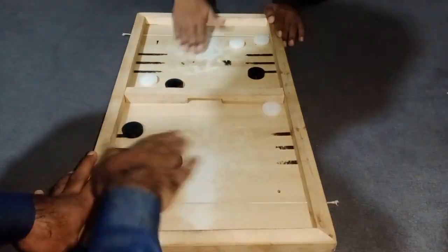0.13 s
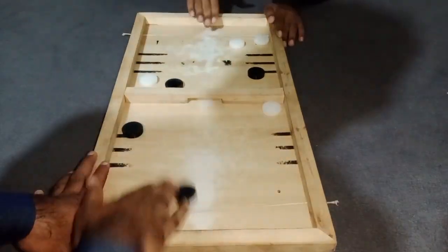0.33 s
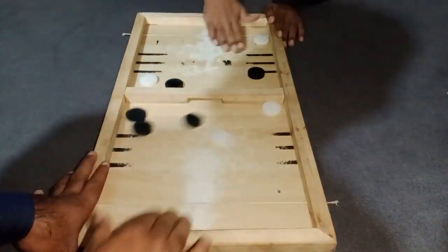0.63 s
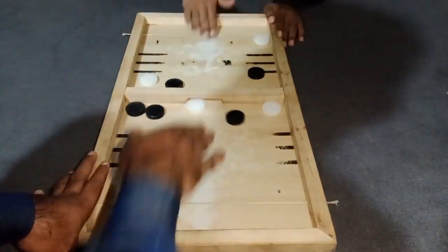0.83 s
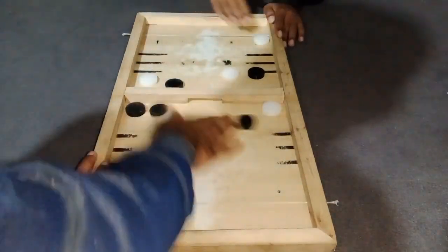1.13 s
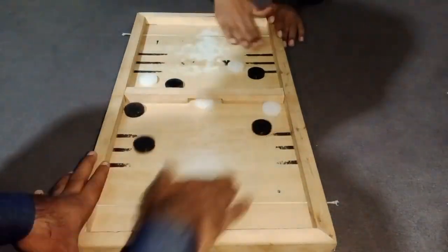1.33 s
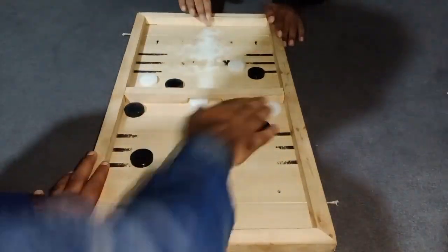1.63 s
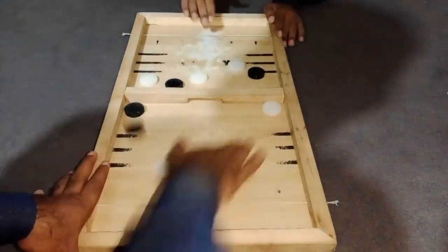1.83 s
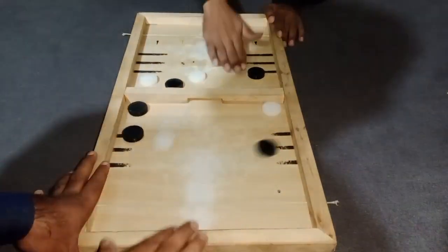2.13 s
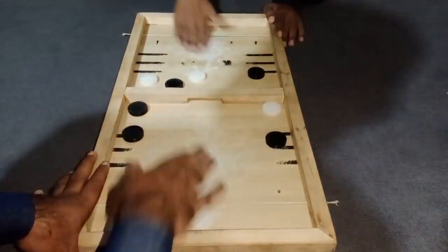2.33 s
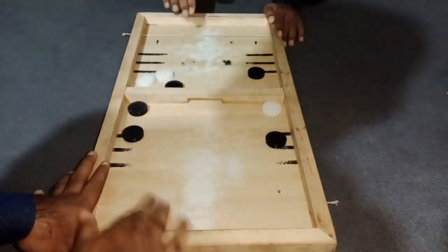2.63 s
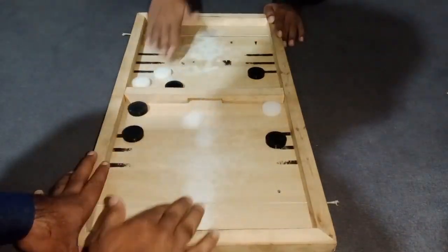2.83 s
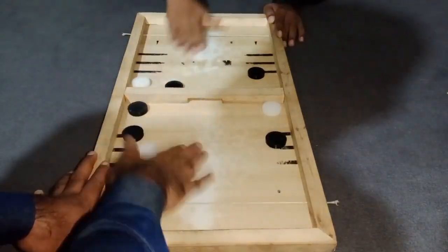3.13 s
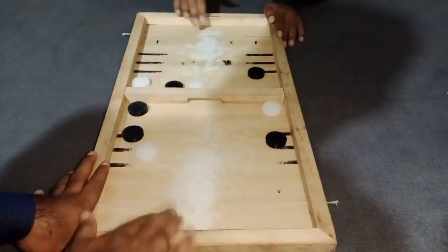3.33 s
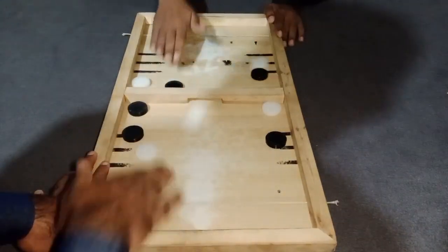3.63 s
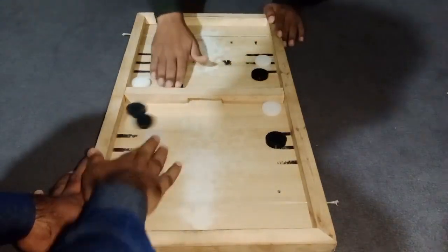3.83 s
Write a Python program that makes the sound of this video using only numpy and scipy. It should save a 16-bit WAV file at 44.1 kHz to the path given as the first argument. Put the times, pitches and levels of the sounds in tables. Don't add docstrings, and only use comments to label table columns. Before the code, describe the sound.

Half a second of soft sliding and scraping, then irregular sharp puck clacks with woody knocks, rebounds and dull frame thumps; small bare room, close phone recording, mono, compressed loudness, faint low background hum.

```python
import sys
import numpy as np
from scipy import signal
from scipy.fft import rfft, irfft, next_fast_len
from scipy.io import wavfile
from scipy.ndimage import uniform_filter1d

SR = 44100
rng = np.random.default_rng(int(sys.argv[2]) if len(sys.argv) > 2 else 0)


def transcribe(signal):
    frames = np.atleast_2d(signal).T
    limited = np.clip(frames, -1, 1)
    pcm = np.round(limited * 32767).astype(np.int16)
    wavfile.write(sys.argv[1], SR, pcm)


def amplitude_ratio(level_db):
    exponent = np.asarray(level_db, float) / 20
    return 10 ** exponent


N = 176400


def unit(x):
    return x / np.sqrt(np.mean(x ** 2, -1, keepdims=True) + 1e-20)


def peak(x):
    return x / np.abs(x).max(1, keepdims=True)


def energy(x):
    return x / np.linalg.norm(x, axis=1, keepdims=True)


def along(points, hz):
    f, v = np.transpose(points)
    return np.interp(np.log(hz + 1), np.log(f + 1), v)


def filtered(x, response):
    m = next_fast_len(x.shape[-1] + 8192)
    spectrum = rfft(x, m) * response(np.fft.rfftfreq(m, 1 / SR))
    return irfft(spectrum, m)[..., :x.shape[-1]]


def patches(shape, across, along_time):
    field = rng.standard_normal(shape)
    field = uniform_filter1d(field, size=across, axis=-2)
    field = uniform_filter1d(field, size=along_time, axis=-1)
    return field / field.std()


def rush(spectrum, patchy_db):
    z = signal.stft(rng.standard_normal(N + 512), nperseg=512)[2]
    field = patches(z.shape, 5, 16)
    field = field - 0.35 * field ** 2
    x = signal.istft(z * amplitude_ratio(patchy_db * field), nperseg=512)[1][:N]
    low_end, high_end = (spectrum[0][0] / 2, -60), (spectrum[-1][0] * 1.5, -60)
    edge = [low_end, *spectrum, high_end]
    return unit(filtered(x, lambda hz: amplitude_ratio(along(edge, hz))))


def placed(times, sounds):
    out = np.zeros(N + 2 * SR)
    for s, x in zip(times, sounds):
        out[round((s + 1) * SR):][:len(x)] += x
    return out[SR:SR + N]


# (frequency [Hz], time to fall 60 dB [s])
ROOM_RING = [(200, 0.52), (1000, 0.37), (4000, 0.38), (12000, 0.17)]
# (frequency [Hz], level [dB])
ROOM_COLOUR = [(200, -0.5), (1000, 0.5), (4000, 0), (8000, -1), (14000, -16.5)]


def room(sounds):
    patchy_db, build_s = 2.2, 0.027
    f, u, z = signal.stft(rng.standard_normal((len(sounds), 28000)), SR, nperseg=256)
    colour_db = along(ROOM_COLOUR, f)[:, None]
    decay_db = -60 * u / along(ROOM_RING, f)[:, None]
    tail_db = patchy_db * patches(z.shape, 3, 12) + colour_db + decay_db
    tail = energy(signal.istft(z * amplitude_ratio(tail_db), SR, nperseg=256)[1])
    rise = np.minimum(np.arange(tail.shape[1]) / (build_s * SR), 1)
    return signal.fftconvolve(sounds, tail * rise, axes=1)


# (time [s], level [dB], pitch [Hz], time to fall 60 dB [s], level sent to the room [dB])
EARLIER_JOLT = (-.06, -24, 248, 0.018, 3)
JOLTS = [(0.360, -44, 252, 0.035, -8), (0.565, -21, 402, 0.017, 5.5), (0.617, -21, 397, 0.018, 5.5),
         (1.069, -24.5, 395, 0.022, 4.5), (1.071, -21.5, 650, 0.012, 9), (1.275, -24, 430, 0.017, -7),
         (1.282, -25.5, 333, 0.026, -0.5), (1.283, -16, 1330, 0.018, 10), (1.778, -22.5, 444, 0.018, 4.5),
         (2.122, -9, 400, 0.0098, -33), (2.124, -4.5, 112.3, 0.012, -32), (2.575, -29, 355, 0.047, 13.5),
         (2.605, -9, 388, 0.015, 5.5), (2.606, -13, 710, 0.0093, 8), (2.689, -28, 183, 0.033, 0),
         (2.853, -12, 930, 0.012, 8), (3.273, -16.5, 296, 0.027, -10.5), (3.468, -16, 856, 0.012, 13),
         (3.619, -29, 384, 0.05, -1.5), (3.686, -26, 283, 0.03, -6.5), (3.695, -17.5, 493, 0.02, -10)]


def frame():
    s, db, hz, t60, room_db = np.transpose([EARLIER_JOLT, *JOLTS])[..., None]
    t = np.arange(8192) / SR
    soft_start = 1 - np.exp(-t / 0.0017)
    jolts = amplitude_ratio(db - 60 * t / t60) * soft_start * np.sin(2 * np.pi * hz * t)
    return placed(s[:, 0], jolts) + placed(s[:, 0], room(amplitude_ratio(room_db) * jolts))


# (time [s], heard peak [dB], clack pitch [Hz], wood knock [dB], limiter duck [dB])
EARLIER_BLOW = (-0.05, -9, 2600, -1.5, 10.5)
RAIL_BLOWS = [(0.5621, -5.5, 6800, -7, 9), (0.6165, -5.5, 2970, -1.5, 7.5), (0.6421, -5.5, 2870, -2, 6),
              (0.8771, -5.5, 7060, -2.5, 5), (1.0676, -8, 5220, -6, 9), (1.273, -10.5, 7800, -5, 8),
              (1.2805, -7, 2970, -2.5, 8.5), (1.4082, -8.5, 3650, -4.5, 3.5), (1.7781, -6, 5080, -8.5, 10),
              (1.928, -6, 5500, -20.5, 8), (1.983, -12, 4050, -4.5, 10.5), (2.1218, -5, 6700, -23, 8.5),
              (2.172, -3.5, 3240, -1.5, 11.5), (2.6036, -4, 5070, -4, 12), (2.8515, -6, 2860, 1, 9),
              (2.9003, -10, 3570, -2, 8), (3.4668, -8, 4300, 2, 10), (3.902, -13, 6700, -23, 7),
              (3.808, -13, 1290, 2, -2), (3.9461, -14, 4100, -11, 5)]
# (time [s], heard peak [dB], clack pitch [Hz], wood knock [dB], level sent to the room [dB])
TAPS = [(0.581, -18, 3040, -2, 0), (0.6581, -8.5, 4600, -1, 0), (0.7035, -7, 2870, 6, 3),
        (0.764, -12, 4170, -4, -18), (.847, -17, 1550, 0.5, 0.5), (0.8668, -15, 2310, -1, -2.5),
        (0.8958, -12.5, 7400, -13, 4), (0.9148, -10, 2450, -3.5, -3.5), (0.9323, -15.5, 1235, -6, -17),
        (0.9675, -21, 2550, -10, -21), (1.3537, -7, 2080, 3, -4), (1.376, -17.5, 2800, 7, -7),
        (1.8, -21, 1270, 5, -1), (1.9883, -11.5, 4300, -10, -11), (2.3332, -9, 1300, 10.5, 0.5),
        (2.675, -22, 1000, 4, -9), (2.716, -19, 1490, -2, -12), (2.7432, -13, 1230, 13, -7),
        (2.8738, -20.5, 3570, 7, -2), (3.5792, -7.5, 6760, -10.5, 4.5), (3.6172, -5.5, 1340, 6, 3.5),
        (3.694, -9, 6650, -7, 1), (3.7136, -16, 4060, -6, -7), (3.687, -18, 1300, -5, -18),
        (3.737, -17.5, 4500, -4, -27), (3.826, -21, 2455, -6, -24), (3.912, -10, 5400, -18, -6),
        (3.923, -12, 2420, -2, 3), (3.952, -12, 2870, 9, 2.5)]


def contacts():
    s, db, hz, knock_db, duck_db = np.transpose([EARLIER_BLOW, *RAIL_BLOWS])
    room_db = 11 + 1.3 * (duck_db - 9)
    return np.hstack([[s, db, hz, knock_db, room_db], np.transpose(TAPS)])


# (pitch [Hz], level [dB], time to fall 60 dB [s])
BOARD_MODES = [(575, -22, 0.0098), (847, -20.5, 0.018), (956, 3, 0.038), (1207, 4, 0.038), (1372, 7, 0.02),
               (1722, -4, 0.07), (2040, -8.5, 0.059), (2870, 5, 0.018), (3705, 10.5, 0.0076)]


def board(chance, damping):
    t = np.arange(4096) / SR
    ring = 0
    for k, (hz, level_db, t60) in enumerate(BOARD_MODES):
        mode_db = level_db + 2 * chance[:, :1, k] - 60 * t * damping / t60
        mode_hz = hz * (1 + 0.068 * chance[:, 1:, k])
        ring = ring + amplitude_ratio(mode_db) * np.sin(2 * np.pi * mode_hz * t)
    return peak(ring)


def pucks():
    clack_cycles, crack_db, thin_hz = 46, -29, 520
    delay_s = 0.0008
    s, db, hz, knock_db, room_db = contacts()
    t = np.arange(4096) / SR
    c = hz[:, None]
    db = db - limiter_db()[np.maximum((s + delay_s) * SR, 0).astype(int)]

    def clack(f, width):
        resonance = 1j * f * c * width / (c * c - f * f + 1j * f * c * width)
        return resonance ** 2 + amplitude_ratio(crack_db) * (c / 5000) ** 4.5

    def thin(f):
        return (1j * f / (thin_hz + 1j * f)) ** 3

    fall_db = 60 * t * 4000 * (c / 4000) ** 0.53 / clack_cycles
    noise = rng.standard_normal((len(s), len(t))) * amplitude_ratio(-fall_db)
    click = np.zeros_like(noise)
    click[:, 0] = 1
    chance = rng.standard_normal((len(s), 2, len(BOARD_MODES)))
    knock = amplitude_ratio(knock_db)[:, None]

    near_clack = peak(filtered(noise, lambda f: clack(f, 0.89)))
    near = peak(filtered(near_clack + knock * board(chance, 1), thin))
    far_clack = 1.496 * peak(filtered(click, lambda f: clack(f, 2.2)))
    far = energy(filtered(far_clack + knock * board(chance, 2.2), thin))
    direct = placed(s + delay_s, amplitude_ratio(db)[:, None] * near)
    return direct + placed(s, room(amplitude_ratio(room_db)[:, None] * far))


# (time [s], hiss [dB], board rasp over hiss [dB], finest powder fizz [dB])
SLIDES = [(0, -46, 9.5, -72), (.19, -51, -1, -90), (.27, -44, -15.5, -63.5), (.48, -43, 1.5, -59.5),
          (.8, -38.5, -6, -63), (1.12, -49.5, -10, -57), (1.41, -46, 2, -77), (1.57, -36, -11.5, -50.5),
          (1.74, -51.5, -5, -68), (2.0, -39.5, 0, -53), (2.22, -49, 7.5, -74), (2.45, -39, -8, -59.5),
          (2.68, -40.5, -5, -55), (2.9, -45, -8, -69), (3.141, -51, -5, -75), (3.221, -41.5, -5.5, -54.5),
          (3.45, -43.5, -3, -66), (4, -50, -10, -66)]
# (frequency [Hz], level per Hz [dB])
HISS = [(1180, -32), (2000, -7.5), (2430, -9.5), (3210, -20), (3950, -20.5), (7580, 2), (10500, -15),
        (13600, -24), (22000, -120)]
RASP = [(180, -17), (300, -26), (336, 2.5), (882, -43), (975, -6), (1350, 6), (2200, -6.5), (4070, 7),
        (6000, -2), (7800, -57), (13200, -120)]
FIZZ = [(10000, 4), (12500, 0), (15500, -2.5)]


def sliding():
    s, *levels = np.transpose(SLIDES)
    hiss_db, rasp_db, fizz_db = [np.interp(np.arange(N) / SR, s, v) for v in levels]
    hiss = rush(HISS, patchy_db=3)
    rasp = rush(RASP, patchy_db=5)
    fizz = rush(FIZZ, patchy_db=10.5)
    return amplitude_ratio(hiss_db + 3.0) * (hiss + amplitude_ratio(rasp_db) * rasp) + amplitude_ratio(fizz_db + 14.5) * fizz


# (time [s], length [s], from pitch [Hz], to pitch [Hz], level [dB])
SCRAPES = [(0.0, 0.23, 1410, 1325, -37.5), (0.059, 0.18, 430, 448, -53.5), (0.247, 0.094, 3200, 3280, -50),
           (0.293, .08, 1600, 1715, -58), (0.373, 0.16, 1250, 1374, -50), (0.381, 0.11, 3890, 3410, -45),
           (0.439, 0.12, 1700, 2200, -51), (1.206, 0.13, 400, 384, -48), (1.501, 0.26, 680, 635, -54.5),
           (1.584, 0.13, 1900, 2170, -54), (1.602, 0.053, 3600, 3900, -41.5),
           (1.686, 0.067, 2100, 1960, -52), (2.0, .1, 2200, 2300, -40), (2.298, 0.2, 400, 396, -51.5),
           (2.488, 0.066, 1750, 2180, -42.5), (2.511, 0.15, 700, 660, -52.5),
           (2.546, 0.11, 1300, 1280, -38.5), (2.604, 0.1, 12500, 12200, -30), (2.66, 0.18, 600, 520, -41),
           (2.999, 0.12, 850, 795, -47), (3.218, 0.172, 1247, 1425, -50), (3.286, 0.14, 2840, 3220, -47),
           (3.69, 0.094, 480, 451, -39)]


def scrapes():
    s, length, from_hz, to_hz, db = np.transpose(SCRAPES)[..., None]
    t = np.arange(SR // 3) / SR
    u = np.clip(t / length, 0, 1)
    hz = from_hz + (to_hz - from_hz) * u
    width_hz = 0.11 * from_hz[..., None]
    grit = rng.standard_normal((len(s), 2, len(t)))
    grit = filtered(grit, lambda f: 1 / (1 + (2 * f / width_hz) ** 2))
    turn = 2 * np.pi * np.cumsum(hz, axis=1) / SR
    sound = unit(grit[:, 0] * np.cos(turn) + grit[:, 1] * np.sin(turn))
    swell = np.abs(np.sin(np.pi * u ** 0.49))
    return placed(s[:, 0], amplitude_ratio(db) * swell * sound)


# (frequency [Hz], level per Hz [dB])
HUM = [(15, -48), (25, 7.5), (361, -6), (556, -39), (723, 7.5), (1000, -18), (1300, -34), (2200, -120)]


def hum():
    return amplitude_ratio(-66) * rush(HUM, patchy_db=-1.5)


def scene():
    return (frame() + pucks() + sliding() + scrapes() + hum())[None]


def limiter_db():
    frame_s, ahead_s, hold_s = 0.02, 0.01, 0.021
    snap_s, snap_share, creep_s = 0.0014, 0.39, 0.051
    s, *_, duck_db = np.transpose([EARLIER_BLOW, *RAIL_BLOWS])[..., None]
    t = np.arange(0, N, 8) / SR
    edge = np.floor((s - ahead_s) / frame_s) * frame_s
    drop = np.clip((t - edge) / 0.00033, 0, 1)
    lead = 1 + 0.45 * (t < s - 0.001) * (t - edge) / frame_s
    after = np.maximum(t - s - hold_s, 0)
    snap = snap_share * np.exp(-after / snap_s)
    creep = (1 - snap_share) * np.clip(1 - after / creep_s, 0, 1)
    duck = np.maximum(duck_db, 0) * drop * lead * (snap + creep)
    return np.interp(np.arange(N) / SR, t, -duck.max(0))


# (from time [s], to time [s], depth [dB])
GATE = [
    (1.012, 1.0669, 8),
    (1.743, 1.7782, 18),
    (2.544, 2.603, 8),
    (2.833, 2.852, 15.5),
    (3.876, 3.902, 4),
]


def gate_db():
    start, end, depth_db = np.transpose(GATE)[..., None]
    t = np.arange(N) / SR
    closing = np.clip((t - start) / (end - start), 0, 1) * (t < end)
    return -(depth_db * closing).sum(0)


# (frequency [Hz], level [dB])
MIC = [(25, -22), (70, 0), (7500, -0.5), (9000, -3.5), (10500, -9), (16000, -7.5)]


def microphone(x):
    return filtered(x, lambda hz: amplitude_ratio(along(MIC, hz)) * np.where(hz < 15900, 1, amplitude_ratio(-25)))


def top_cut(x):
    return signal.sosfilt(signal.butter(12, 16860, fs=SR, output="sos"), x)


def record(dry):
    mix = microphone(dry * amplitude_ratio(limiter_db() + gate_db()))
    return top_cut(mix)


dry = scene()
out = record(dry)
transcribe(out)
```